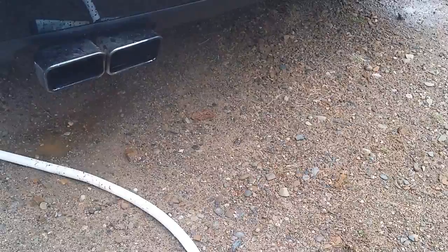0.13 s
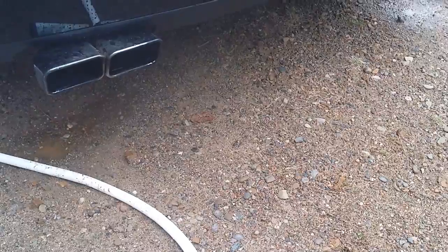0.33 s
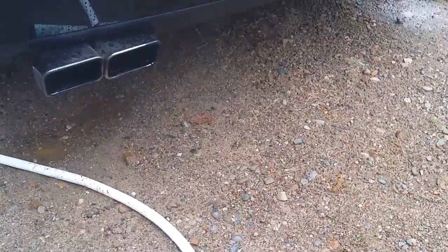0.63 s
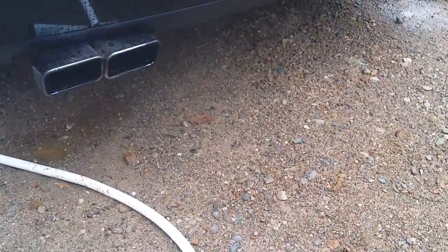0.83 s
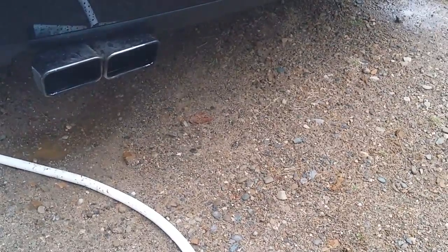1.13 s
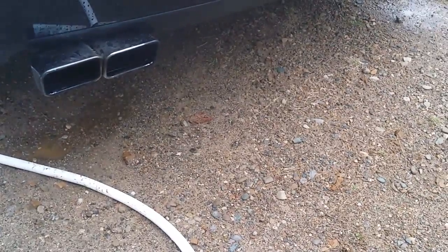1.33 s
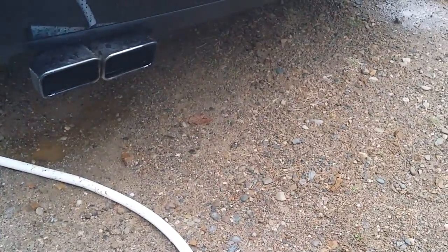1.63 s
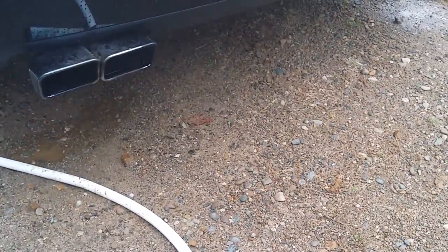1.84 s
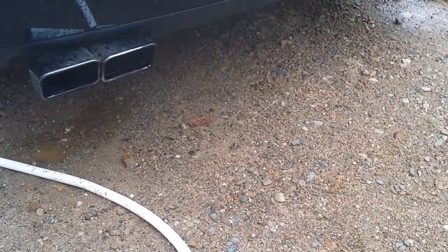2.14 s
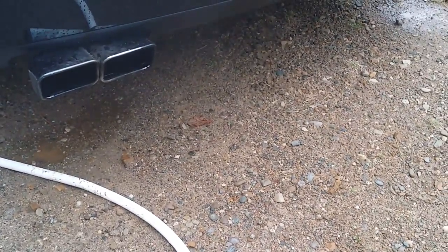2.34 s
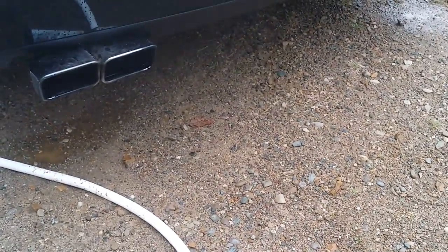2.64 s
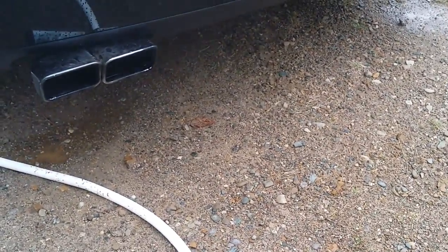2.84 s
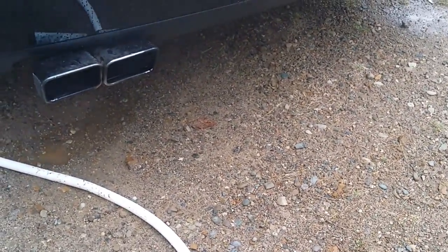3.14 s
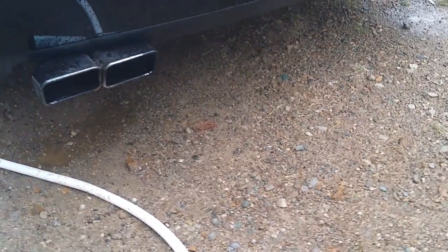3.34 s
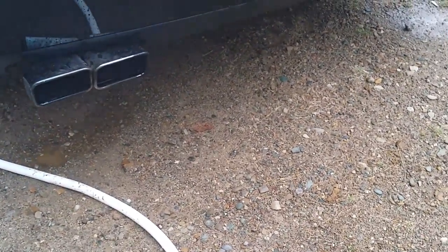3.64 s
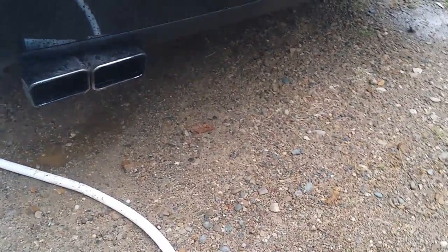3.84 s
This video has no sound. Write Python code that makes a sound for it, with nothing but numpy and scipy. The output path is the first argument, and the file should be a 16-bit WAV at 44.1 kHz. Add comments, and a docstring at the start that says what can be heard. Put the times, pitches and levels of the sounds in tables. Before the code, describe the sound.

Close exhaust rumble of an idling car on gravel: near silence first, then a heavy low throb with uneven burbling, light puffing hiss and tiny ticks, continuing to the end without revving.

```python
"""Outdoors, close to the twin tailpipes of an idling V8 car.
Eight uneven firings a cycle drive a deep boom, a sum of cosines at multiples of the cycle rate.
The blows and the gas rushing behind them also ring the pipes, modelled as a bank of resonances.
Puffs of hiss, sharp ticks and a lumpy rumble are coloured noise under envelopes.
The recorder fades in after a moment of near silence."""
import sys
import numpy as np
from scipy import signal
from scipy.fft import rfft, irfft, next_fast_len
from scipy.io import wavfile

SR = 44100
rng = np.random.default_rng(int(sys.argv[2]) if len(sys.argv) > 2 else 0)


def generate_wav(sig):
    """Save sig (samples, or channels by samples) to the path in sys.argv[1] as 16-bit PCM at SR."""
    pcm = np.round(np.clip(np.atleast_2d(sig).T, -1, 1) * 32767).astype(np.int16)
    wavfile.write(sys.argv[1], SR, pcm)


N = 176400
LENGTH = next_fast_len(N + SR // 10)  # the working length has a spare tail
T, HZ = np.arange(LENGTH) / SR, np.fft.rfftfreq(LENGTH, 1 / SR)

# crank speed: (time [s], speed [rpm])
CRANK_SPEED = [(0.4, 1349.9), (0.9, 1342.5), (1.15, 1340.6), (1.35, 1365.1), (1.6, 1368.9), (1.9, 1366.4),
               (2.35, 1346.0), (2.8, 1335.0), (3.1, 1340.2), (3.5, 1353.9), (4.0, 1361.9)]
# firings of one engine cycle:
# (place in the cycle [0-1], relative blow [dB], relative gas puff [dB], relative tick [dB])
FIRINGS = [(.1039, 6, -12, -10), (0.223, 4, 6, -1), (0.3539, 5, -6, -5), (0.4714, -0.7, 8.5, -18),
           (0.594, 1.5, 7.5, -11.5), (0.71, 2.4, 7.5, -8.5), (0.849, 5.5, 7, 5), (0.9725, 2.93, 3.5, -12.5)]
# boom of the silencer: (order, a multiple of the cycle rate [-], relative level [dB])
BOOM_ORDERS = [(4, -52.5), (5, -65.5), (6, -54), (7, -44.5), (8, -8), (9, -33.5), (10, -28.5), (11, -33),
               (12, -66.5), (13, -35.5), (14, -39), (15, -32), (16, -29.5), (17, -25.5), (18, -32),
               (19, -65), (20, -44), (21, -37.5), (22, -41.5), (23, -42), (24, -38), (25, -31), (26, -39.8)]
# throb of the upper boom orders: (time [s], level [dB])
THROB_LEVEL = [(.6, 0), (1.2, -1), (1.7, 3), (2.2, 1), (2.8, -2), (4, -1.5)]
# resonances of the tailpipes: (frequency [Hz], width [Hz], relative level [dB])
PIPE_MODES = [(341, 79, -13.5), (398.3, 15, -3.9), (469, 15.5, -3.5), (503.7, 9.8, 0), (558.3, 13.8, 0),
              (624.3, 9.4, -0.5), (665.8, 29.5, 4), (698.7, 94.6, 1.14), (725.7, 55.5, -1), (774, 14, -6.5),
              (841, 77, -6), (941, 56, -15)]
# narrow rings of the outlet tips: (frequency [Hz], width [Hz], boost [dB])
TIP_MODES = [(1082, 25, 5), (1165, 30, 5), (1265, 25, 7), (1462, 30, 4), (1660, 35, 5), (1930, 35, 4),
             (2170, 70, 5), (3000, 100, 3), (3560, 100, 5), (4950, 140, 3), (6120, 170, 7), (8000, 200, 5)]
# gas noise at the outlets: (frequency [Hz], relative spectral level [dB])
HISS_SPECTRUM = [(650, -18), (1050, -1.5), (1400, 1), (1850, -4.5), (2250, -0.5), (2850, -3.5), (3550, -7),
                 (4300, -11), (5000, -9), (5700, -7), (6650, -8.5), (7100, -12), (8100, -13.5), (9000, -19),
                 (10400, -22.5), (12500, -19.5), (15300, -23)]
# sharp ticks riding on the puffs: (frequency [Hz], relative spectral level [dB])
TICK_SPECTRUM = [(900, -25.5), (1600, -1), (2200, 3.5), (3000, -5), (4200, -15), (6100, -4), (8000, -14),
                 (10000, -25), (15000, -30)]
# turbulent rumble: (frequency [Hz], relative spectral level [dB])
RUMBLE_SPECTRUM = [(12, -4), (30, -9.5), (55, -1.5), (110, -3.5), (200, -5), (320, -11), (480, -8),
                   (650, -5.5), (900, -6.5), (1020, -17), (1500, -31.5), (4000, -84.5)]
# likeness of the gas noise at the two microphones: (frequency [Hz], correlation [-1 to 1])
MIC_LIKENESS = [(20, 0.88), (200, 1), (800, 0.97), (1200, -0.23), (1600, -0.16), (2500, -0.32),
                (4000, -0.28), (15000, 0.25)]
# level balance of the microphones: (frequency [Hz], left minus right [dB])
MIC_BALANCE = [(60, 9.5), (87, 2.5), (130, 1), (180, 2), (260, 4.5), (380, 5.5), (540, 3.0), (780, 0.5),
               (1130, 0), (1640, 1.5), (2360, 0), (3410, 3), (4920, 11.5), (7110, 6), (10300, -2.5),
               (14800, 16)]
# phase lead of the left microphone over the right: (frequency [Hz], lead [rad])
MIC_LEAD = [(90, 0.13), (190, 0.28), (280, 0.22), (390, 0.18), (480, 0.097), (570, 0.46), (660, 0.55),
            (780, 0.17), (900, 0.45), (1300, 0)]

START_CYCLE = -.483  # engine cycles
BLOW_SPREAD_DB, BLOW_JITTER_S = .8, .00005  # rms; the jitter serves puffs and ticks too
BOOM_DB, BOOM_LAG_CYCLES = -0.5, 0.0956
# rms wavering of the orders (fraction of the amplitude) and of their shared timing (cycles)
BOOM_WAVER, FIRING_WAVER, SWAY_CYCLES = .09, .015, .0006
# orders above THROB_ORDER swell together once a cycle, at THROB_PLACE (0-1)
THROB_ORDER, THROB_PLACE = 22, .1
BLOWS_DB, PIPE_GAS_DB = -28.5, -42.5
BLOW_WIDTH_S, RUSH_RISE_S = 0.00018, 0.0019
HISS_DB, PUFF_DELAY_S, PUFF_RISE_S, PUFF_SPREAD_DB = -41, 0.001, 0.0029, 1.5
STEADY_FLOW = 1.56  # relative to the rms of the puffs
TICK_DB, TICK_DELAY_S, TICK_RISE_S, TICK_SPREAD_DB = -48.5, 0.00027, .0013, 2
RUMBLE_DB, RUMBLE_SWELL_DB = -29.5, 1
FADE_START_S, FADE_END_S, FADE_FIRST_DB, MUTED_DB = .389, 0.68, -21, -94
EDGE_HZ = 15500


def amp(db):
    """Level law: decibels become an amplitude gain."""
    return 10 ** (np.asarray(db) / 20)


def unit(x):
    """Normalisation by mean power: scales to rms 1."""
    return x / np.sqrt(np.mean(x ** 2) + 1e-20)


def read(points):
    """Logarithmic frequency scale: interpolates a table onto the frequency axis."""
    hz, value = np.transpose(points)
    return np.interp(np.log(HZ + 1), np.log(hz + 1), value)


def drift(rate_hz):
    """Low-passed random process: noise under a Gaussian response, rms 1."""
    white = rfft(rng.standard_normal(LENGTH))
    return unit(irfft(white * np.exp(-(HZ / rate_hz) ** 2), LENGTH))


def firings(cycle, levels_db, spread_db, delay_s=0):
    """Impulse excitation: one impulse per firing, each a little off in time and strength."""
    turns = np.arange(-1, np.ceil(cycle[-1]))[:, None] + np.array(FIRINGS)[:, 0]
    chance = rng.standard_normal(turns.shape + (2,))
    seconds = np.interp(turns, cycle, T) + delay_s + BLOW_JITTER_S * chance[..., 0]
    at = np.round(seconds * SR).astype(int)
    strength = amp(levels_db + spread_db * chance[..., 1])
    keep = (turns > cycle[0]) & (turns < cycle[-1]) & (at >= 0) & (at < LENGTH)
    return np.bincount(at[keep], strength[keep], LENGTH)


def puffs(impulses, rise_s):
    """Convolution with a pulse u*exp(-u): each impulse swells to a peak after rise_s and dies away."""
    u = T[:SR // 20] / rise_s
    return unit(signal.fftconvolve(impulses, u * np.exp(-u))[:LENGTH])


def resonance(hz, width):
    """Damped harmonic oscillator: response of one mode, gain 1 at its centre."""
    return 1j * HZ * width / (hz ** 2 - HZ ** 2 + 1j * HZ * width)


def noise(spectrum_db, envelope):
    """Partial coherence: enveloped, coloured noise, partly alike at the two microphones."""
    a, b = rfft(rng.standard_normal((2, LENGTH)) * envelope)
    like = np.clip(read(MIC_LIKENESS), -1, 1)
    pair = np.array([a, like * a + np.sqrt(1 - like ** 2) * b])
    return unit(irfft(pair * amp(spectrum_db), LENGTH))


def boom(cycle):
    """Fourier series of engine orders, phased by the uneven blows; the firing order dominates."""
    place, blow_db = np.array(FIRINGS).T[:2]
    swayed = cycle + SWAY_CYCLES * drift(rate_hz=18)
    out = np.zeros(LENGTH)
    for order, db in BOOM_ORDERS:
        # the phase is that of the sum of the eight blows at this order
        blows = amp(blow_db) * np.exp(-2j * np.pi * order * (place + BOOM_LAG_CYCLES))
        lead = np.angle(np.sum(blows))
        if order > THROB_ORDER:
            lead = -2 * np.pi * order * THROB_PLACE
            db = db + np.interp(T, *np.transpose(THROB_LEVEL))
        waver = FIRING_WAVER if order == len(FIRINGS) else BOOM_WAVER
        level = amp(db) * (1 + waver * drift(rate_hz=3.5))
        out -= level * np.cos(2 * np.pi * order * swayed + lead)
    return np.sqrt(2) * amp(BOOM_DB) * out


def bark(cycle):
    """Forced resonance: every blow, and the rush of gas behind it, rings the tailpipes."""
    blows = firings(cycle, np.array(FIRINGS)[:, 1], BLOW_SPREAD_DB)
    rush = puffs(blows, RUSH_RISE_S) * rng.standard_normal(LENGTH)
    pipes = 0
    for k, (hz, width, db) in enumerate(PIPE_MODES):
        pipes = pipes + (-1) ** k * amp(db) * resonance(hz, width)  # neighbours alternate in sign
    pipes = pipes * np.exp(-(np.pi * HZ * BLOW_WIDTH_S) ** 2)  # finite width of a blow
    rung_blows = unit(irfft(rfft(blows) * pipes, LENGTH))
    rung_rush = unit(irfft(rfft(rush) * pipes, LENGTH))
    return amp(BLOWS_DB) * rung_blows + amp(PIPE_GAS_DB) * rung_rush


def gas(cycle):
    """Flow noise: puffs of hiss over a steady flow, tip-coloured ticks, and a lumpy rumble below."""
    puff_db, tick_db = np.array(FIRINGS).T[2:]
    pulsing = puffs(firings(cycle, puff_db, PUFF_SPREAD_DB, PUFF_DELAY_S), PUFF_RISE_S)
    flow = np.hypot(STEADY_FLOW, pulsing)
    ticking = puffs(firings(cycle, tick_db, TICK_SPREAD_DB, TICK_DELAY_S), TICK_RISE_S)
    lumps = amp(RUMBLE_SWELL_DB * drift(rate_hz=12))
    tips_db = sum(db * abs(resonance(hz, width)) ** 2 for hz, width, db in TIP_MODES)
    hiss = amp(HISS_DB) * noise(read(HISS_SPECTRUM) + tips_db, flow)
    ticks = amp(TICK_DB) * noise(read(TICK_SPECTRUM) + tips_db, ticking)
    rumble = amp(RUMBLE_DB) * noise(read(RUMBLE_SPECTRUM), lumps)
    return hiss + ticks + rumble


def scene():
    """Superposition: the exhaust sources add, with level and phase differences between microphones."""
    rpm = np.interp(T, *np.transpose(CRANK_SPEED))
    cycle = START_CYCLE + np.cumsum(rpm) / (120 * SR)  # two crank turns make one cycle
    halves = [.5, -.5]  # left, right
    gain = amp(np.outer(halves, read(MIC_BALANCE)))
    sides = gain * np.exp(1j * np.outer(halves, read(MIC_LEAD)))
    sides = sides / np.sqrt(np.mean(abs(sides) ** 2, axis=0))  # keeps the mean power
    exhaust = boom(cycle) + bark(cycle) + gas(cycle)
    return irfft(rfft(exhaust) * sides, LENGTH)[:, :N]


def record(dry):
    """Amplitude fade and band limitation: the muted input opens quickly, then a low-pass acts."""
    fade = np.interp(T[:N], [FADE_START_S, FADE_END_S], [amp(FADE_FIRST_DB), 1], left=amp(MUTED_DB))
    low_pass = signal.firwin(511, EDGE_HZ, window=("kaiser", 9), fs=SR)
    return signal.oaconvolve(dry * fade, low_pass[None], "same")


dry = scene()
out = record(dry)
generate_wav(out)
```